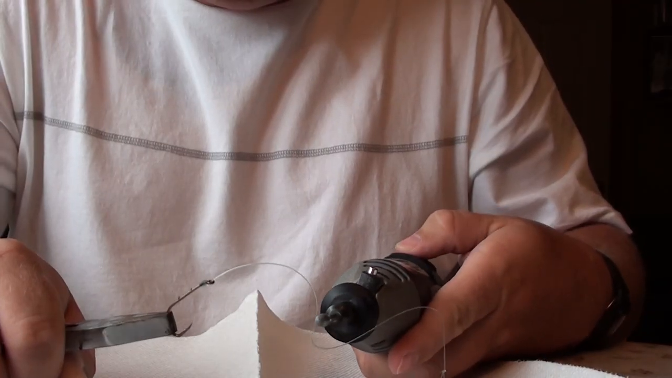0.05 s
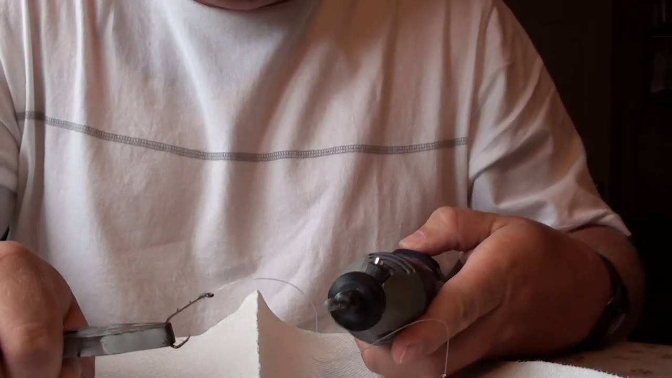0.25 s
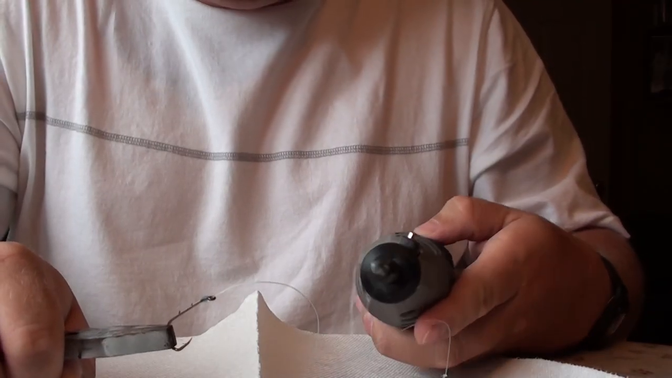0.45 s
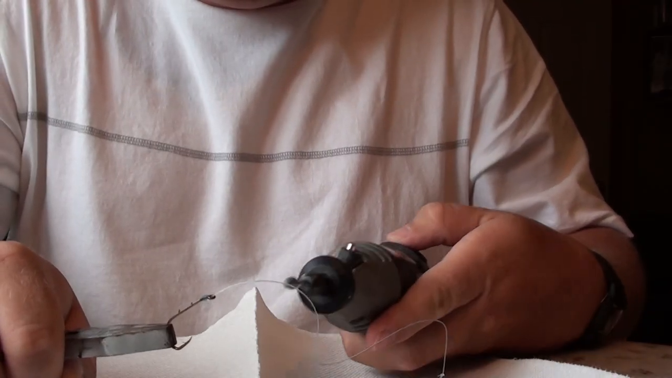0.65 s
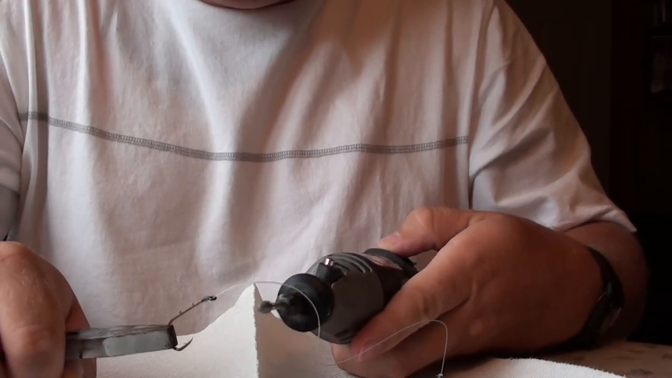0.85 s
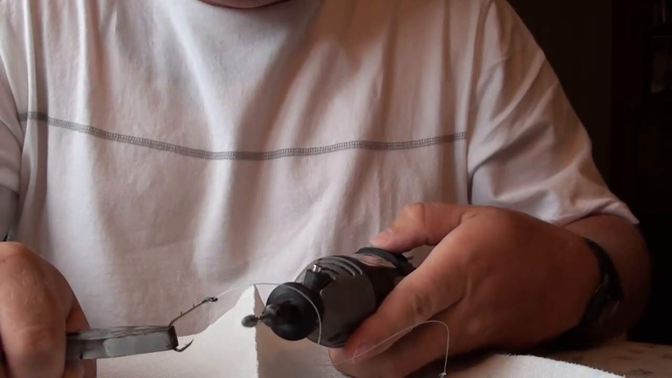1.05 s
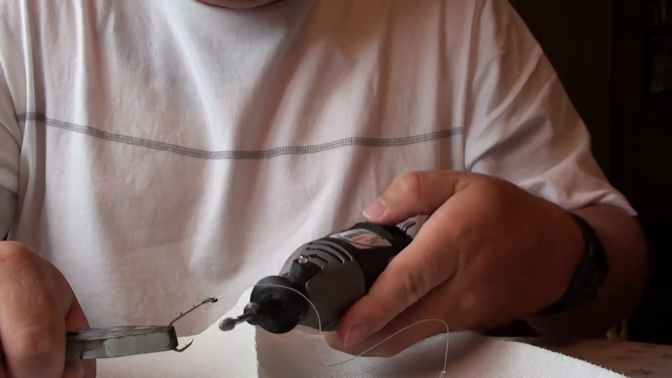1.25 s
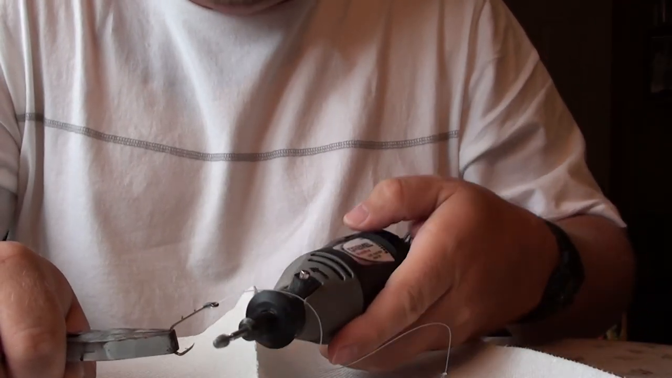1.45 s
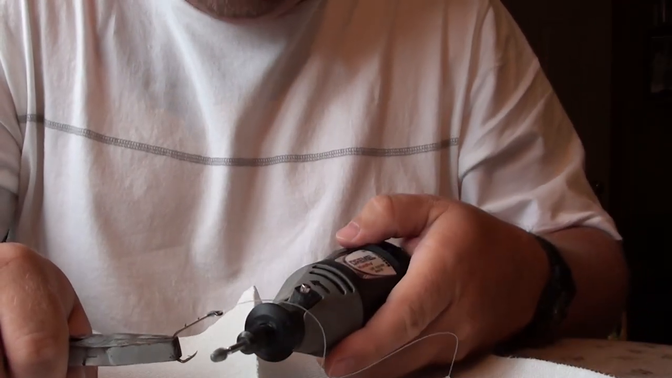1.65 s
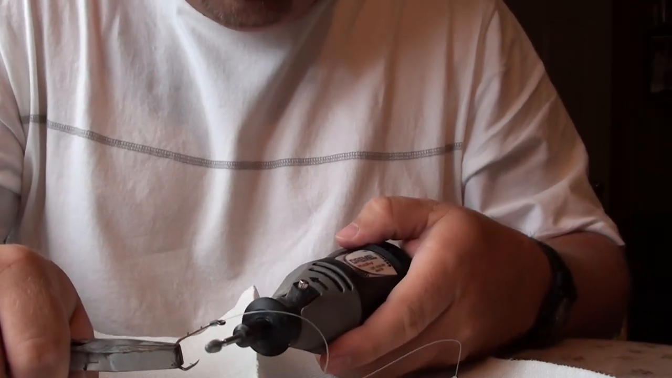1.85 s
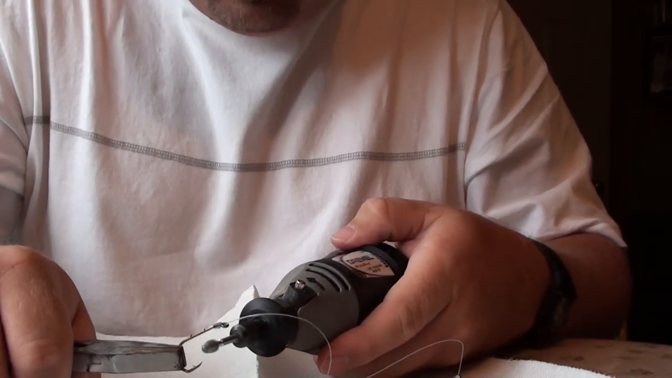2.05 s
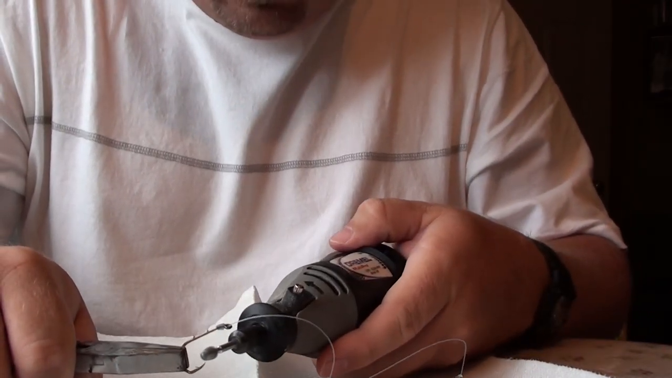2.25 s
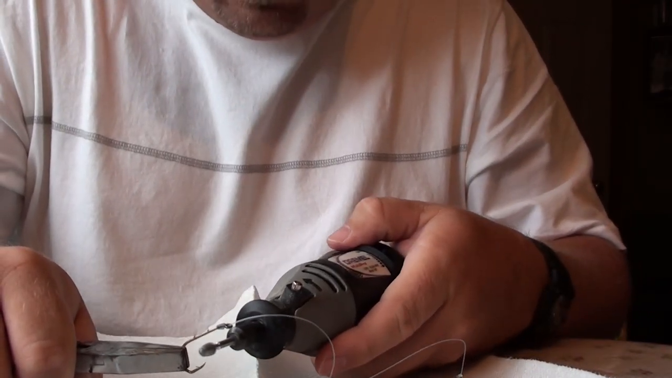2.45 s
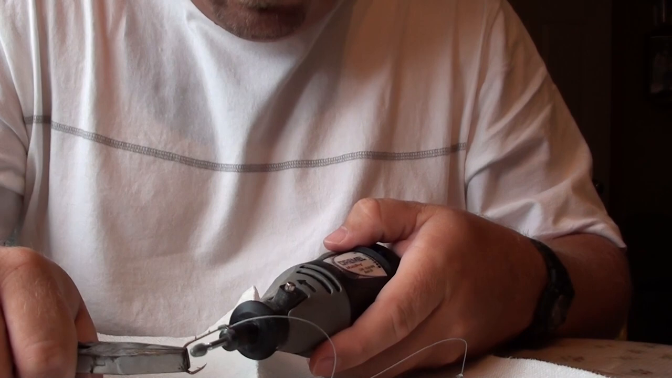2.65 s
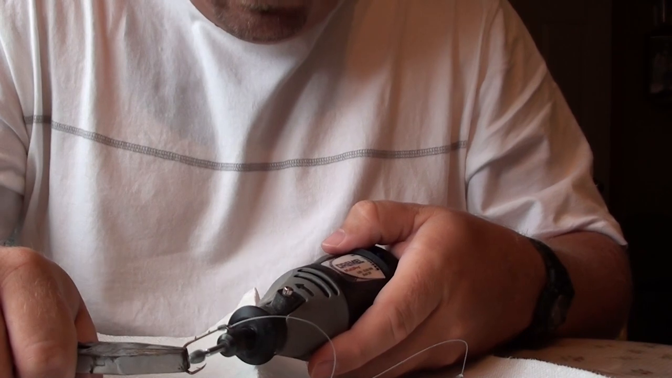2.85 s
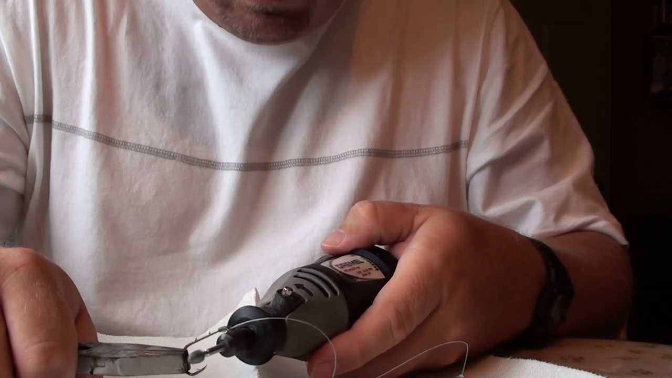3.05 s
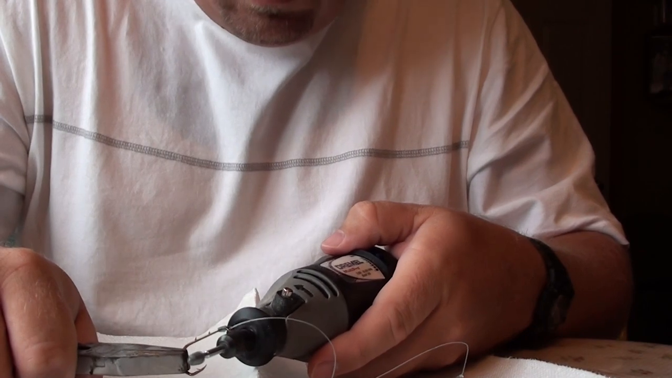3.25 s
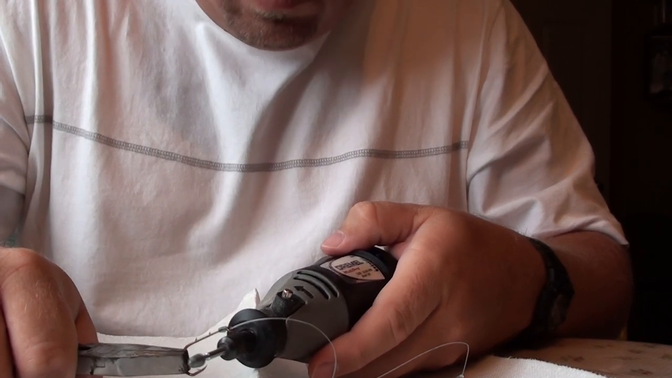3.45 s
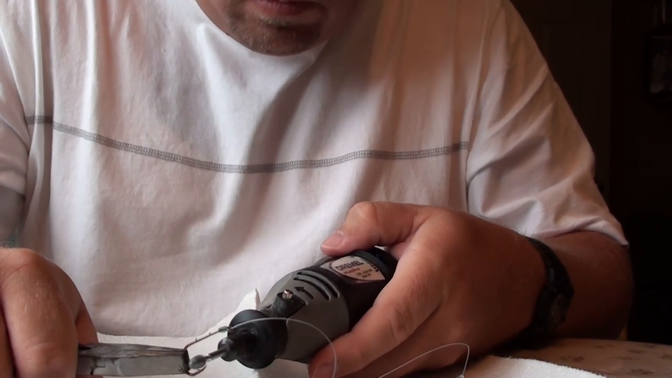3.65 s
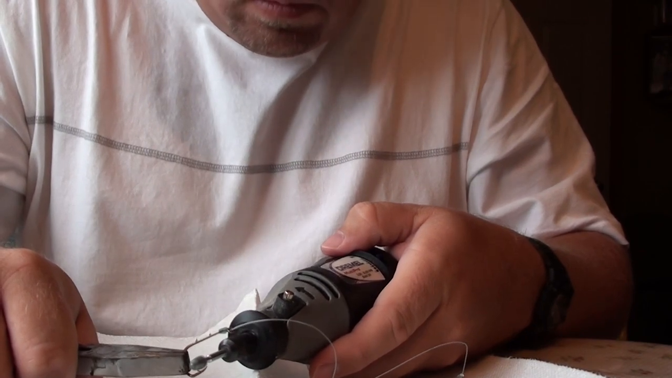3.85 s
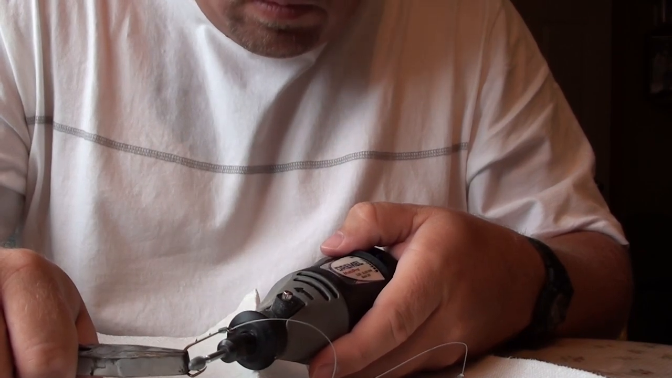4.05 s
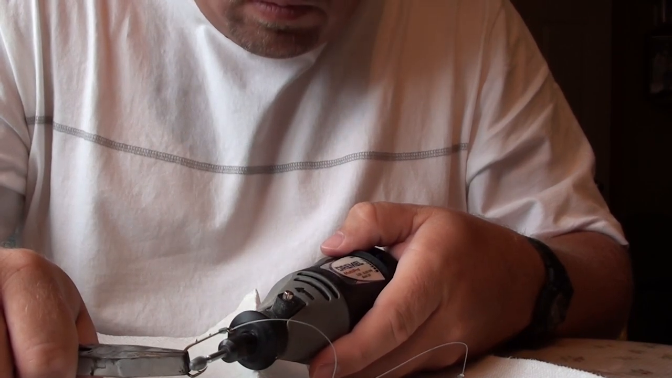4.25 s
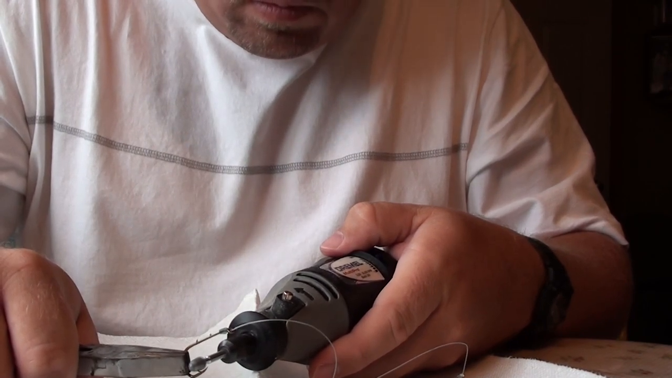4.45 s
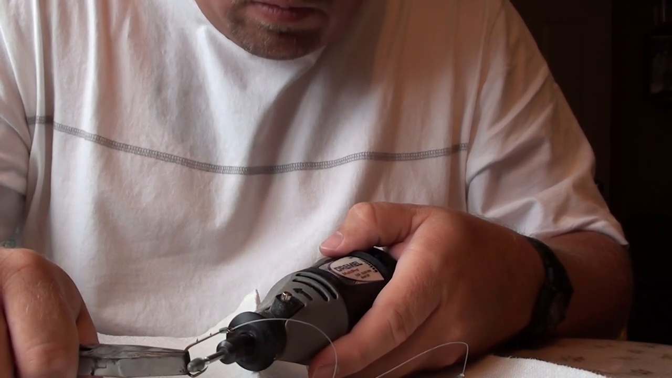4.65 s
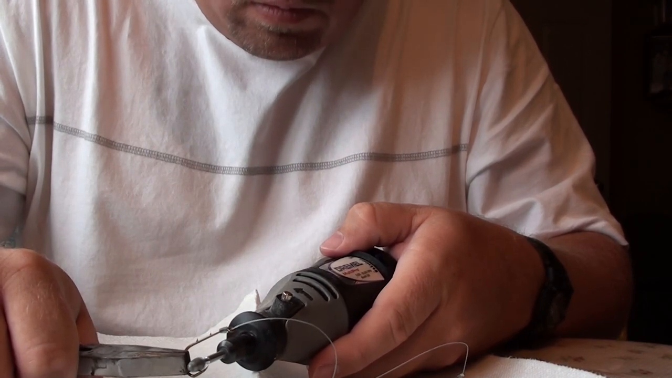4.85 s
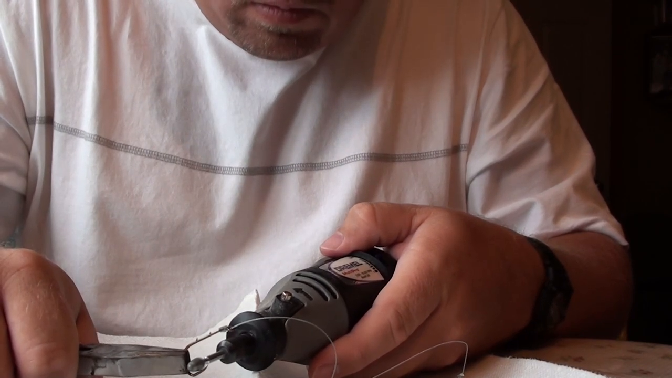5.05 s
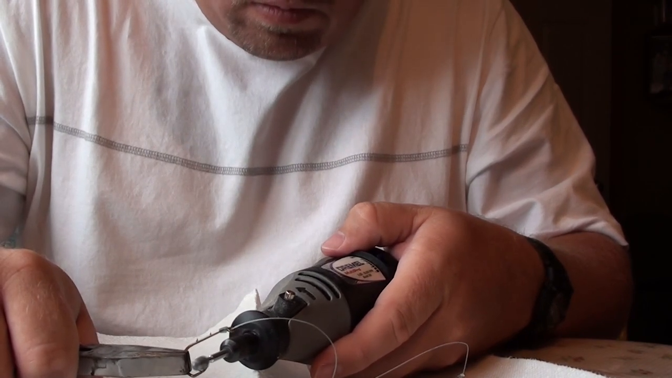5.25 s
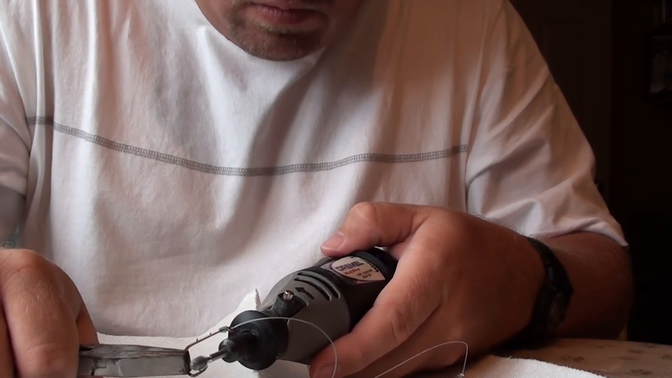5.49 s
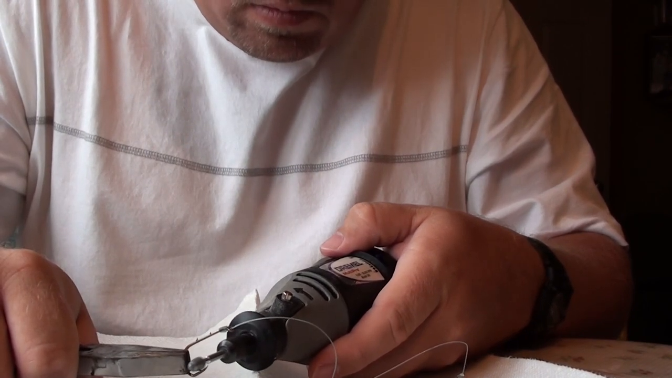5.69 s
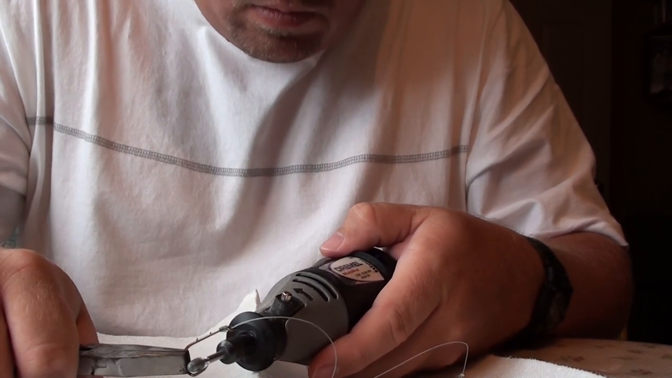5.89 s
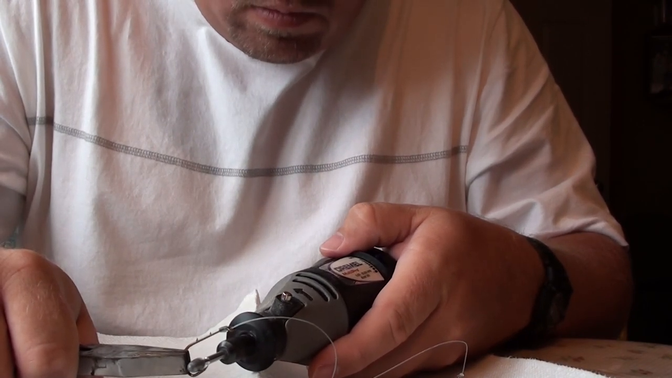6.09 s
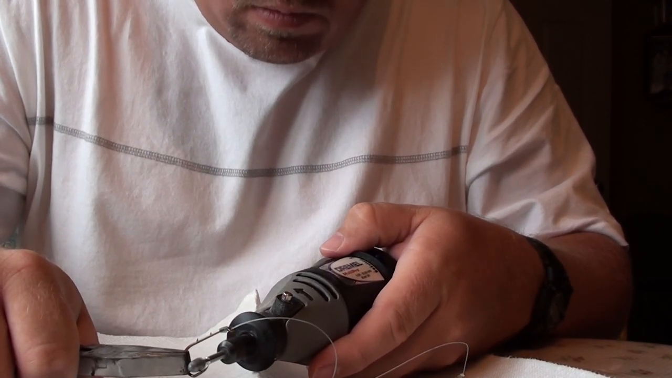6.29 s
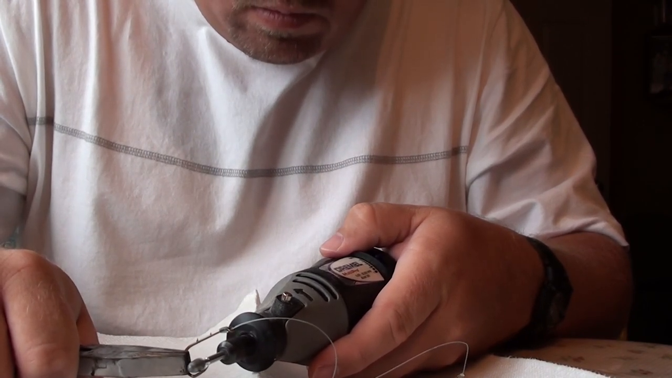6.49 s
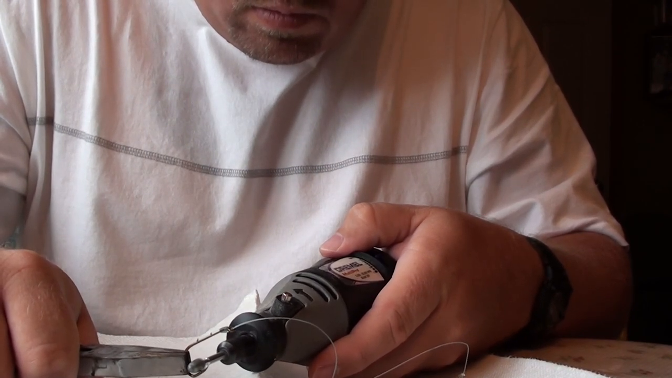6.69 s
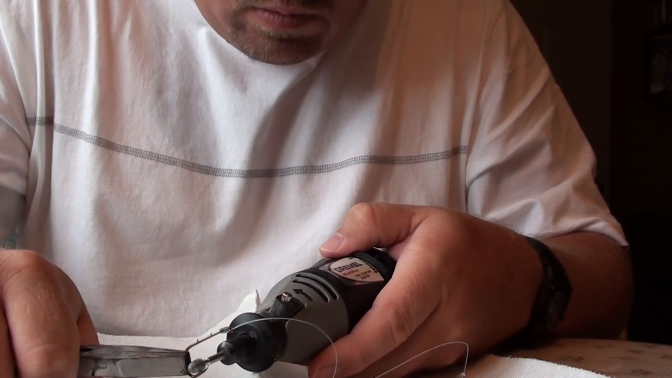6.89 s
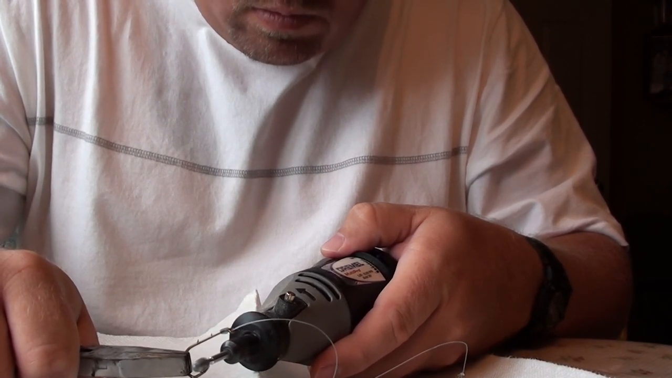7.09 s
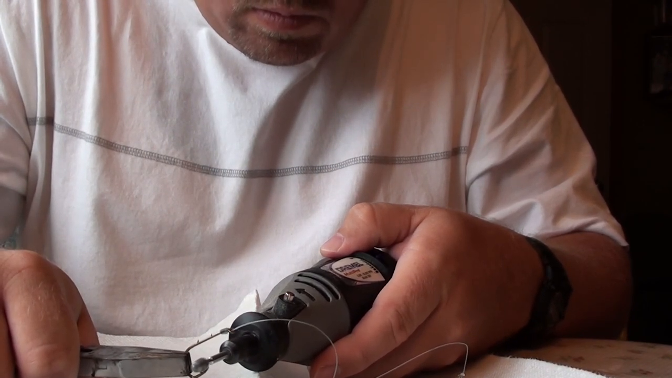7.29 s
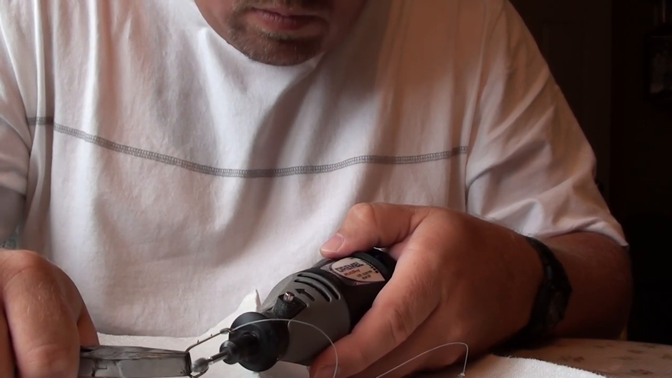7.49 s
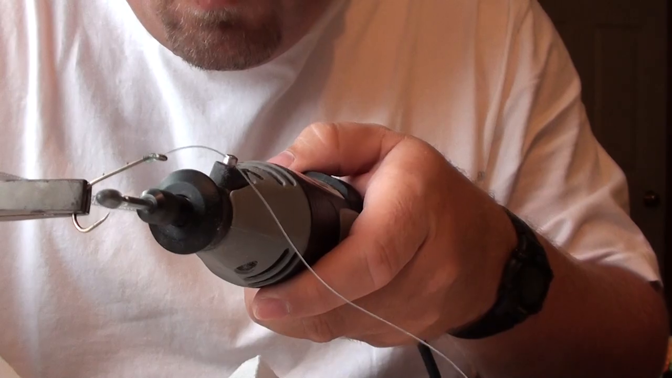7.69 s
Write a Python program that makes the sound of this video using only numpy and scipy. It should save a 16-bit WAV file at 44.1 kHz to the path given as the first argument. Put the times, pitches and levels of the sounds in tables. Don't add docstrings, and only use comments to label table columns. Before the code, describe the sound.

A mains-powered rotary tool very close to the microphone whirrs and accelerates, clicks to a faster setting and settles into a steady, rough electric whine with airy fan hiss. After about three seconds, abrasive metal grinding begins, dry, shrill and uneven, with brief pliers rings and low buzzing shakes of the hook. Faint room rumble and hum lie beneath, with little echo.

```python
import sys
import numpy as np
from scipy import signal
from scipy.fft import rfft, irfft, next_fast_len
from scipy.io import wavfile
from scipy.ndimage import uniform_filter1d, minimum_filter1d, map_coordinates

SR = 44100
rng = np.random.default_rng(int(sys.argv[2]) if len(sys.argv) > 2 else 0)


def transcribe(signal):
    frames = np.atleast_2d(signal).T
    limited = np.clip(frames, -1, 1)
    pcm = np.round(limited * 32767).astype(np.int16)
    wavfile.write(sys.argv[1], SR, pcm)


def linear_from_db(decibels):
    return 10 ** (np.asarray(decibels, float) / 20)


N = 340893
MAINS_HZ = 120.005


def unit(x):
    return x / np.sqrt(np.mean(x ** 2) + 1e-20)


def levelled(x):
    return x / np.sqrt(np.abs(uniform_filter1d(x ** 2, size=SR // 12)) + 1e-12)


def along(points, hz):
    f, v = np.transpose(points)
    return np.interp(np.log(hz + 1), np.log(f + 1), v)


def curves(rows):
    s, *cols = np.transpose(rows)
    return [np.interp(np.arange(N) / SR, s, c) for c in cols]


def wobble(rate):
    at = np.arange(0, N + 32, 32)
    knots = rng.standard_normal(int(N * rate / SR) + 4)
    return np.interp(np.arange(N), at, map_coordinates(knots, [at * rate / SR]))


def presses(rows, ramp_s):
    t = np.arange(N) / SR
    return sum(linear_from_db(db) * np.clip(np.minimum(t - start, end - t) / ramp_s, 0, 1) for start, end, db in rows)


def filtered(x, response):
    m = next_fast_len(N + SR // 2)
    return irfft(rfft(x, m) * response(np.fft.rfftfreq(m, 1 / SR)), m)[..., :N]


def resonances(modes, f):
    return sum((-1) ** k * linear_from_db(db) * 1j * f * w / (c * c - f * f + 1j * f * w)
               for k, (c, w, db) in enumerate(modes))


def resonant(x, modes, skirt_hz):
    skirt = [(modes[1][0], skirt_hz, 0)]
    return filtered(x, lambda f: resonances(modes, f) * resonances(skirt, f))


# (frequency [Hz], level [dB per Hz])
RUMBLE_COLOUR = [(22, -40), (45, -28), (95, -13), (130, -0.5), (200, 0), (350, -1.5), (500, 1.5),
                 (900, -31)]
# (frequency [Hz], level re rumble [dB])
MAINS_HUM = [(60, -25), (120, -12), (480, -3)]
HOUSE_DB = -56.5


def house():
    t = np.arange(N) / SR
    hum = sum(linear_from_db(db + 2.9 * wobble(6)) * np.sin(2 * np.pi * hz * t + 0.65 * wobble(11)) for hz, db in MAINS_HUM)
    rumble = unit(filtered(rng.standard_normal(N), lambda hz: linear_from_db(along(RUMBLE_COLOUR, hz))))
    return linear_from_db(HOUSE_DB + 5.5) * (rumble + hum)


# (frequency [Hz], time to fall 60 dB [s])
REVERB_TIMES = [(200, 0.66), (2000, 0.057), (12000, 0.22)]


def room(x):
    hz, t, z = signal.stft(rng.standard_normal((2, SR // 3)), SR, nperseg=256)
    decay = linear_from_db(-60 * t / along(REVERB_TIMES, hz)[:, None])
    tail = signal.istft(z * decay, SR, nperseg=256)[1]
    delayed = np.pad(x, (200, 0))[None]
    return signal.fftconvolve(delayed, tail / np.linalg.norm(tail[0]), axes=1)[:, :N]


# (time [s], peak level [dB], frequency [Hz])
SLIDER_CLICKS = [
    (0.922, -6, 3950),
    (0.934, -4, 2500),
]


def switch():
    out, t = np.zeros(N), np.arange(SR // 50) / SR
    for s, db, hz in SLIDER_CLICKS:
        noise = uniform_filter1d(rng.standard_normal(len(t) + 1), size=4)
        crack = np.diff(uniform_filter1d(noise, size=3))
        decay = linear_from_db(db - 8.5 - 60 * t / 0.027)
        out[round(s * SR):][:len(t)] += decay * (0.5 * np.sin(2 * np.pi * hz * t) + 3 * crack)
    return out


SLOW_TPS, SLOW_GAP_TPS, SLOW_LAG_S = 185, 78, .6
FAST_GAP_TPS, FAST_LAG_S = 118, .37
# (time [s], speed [turns per s])
FAST_SPEED = [
    (.92, 286.8),
    (2.2, 288.2),
    (2.8, 288),
    (4.0, 290.6),
    (4.6, 290.6),
    (5.2, 289.5),
    (5.8, 290.5),
    (6.7, 289.6),
    (7.0, 288.7),
    (7.73, 289.3),
]


def spin():
    t = np.arange(N) / SR
    step_s = FAST_SPEED[0][0]
    slow = SLOW_TPS - SLOW_GAP_TPS * np.exp(-t / SLOW_LAG_S)
    fast = curves(FAST_SPEED)[0] - FAST_GAP_TPS * np.exp((step_s - t) / FAST_LAG_S)
    return np.where(t < step_s, slow, fast)


# (order [per turn], slow level [dB], fast level [dB]), re fan hiss
SHAFT_ORDERS = [(1.007, -26, -17), (1.432, -46, -23), (3.002, -39, -29), (12, -32, -18.5), (13, -50, -12.5),
                (13.9, -18.5, -14), (18.02, -26, -8), (18.4, -21, -31), (22.16, -17, -21.5),
                (25.03, -22, -19), (25.9, -27, -20.5), (26.05, -33, -17), (26.3, -37, -53), (28, -35, -28),
                (28.67, -26, -23), (35.56, -52, -22), (35.5, -46, -18), (37.5, -34, -19), (38.6, -29, -34),
                (42.5, -22, -40), (41.6, -40, -21), (46.6, -30, -29), (47.6, -27, -18), (49.5, -23, -24),
                (54, -21, -18)]
# (frequency [Hz], level [dB per Hz])
SLOW_COLOUR = [(150, -37), (250, -20), (775, -11.5), (1140, -5.5), (1370, -8.5), (1900, -10), (2500, -2),
               (2980, -10.5), (3470, -5.5), (5440, -7), (6100, -4), (7930, -3.5), (13400, -18.5),
               (16000, -31)]
# (frequency [Hz], level [dB per Hz])
FAST_COLOUR = [(150, -37), (283, -26), (715, -16), (852, -9.5), (1180, -12), (1340, -21.5), (1810, -11),
               (2320, -16.5), (3140, -17.5), (3830, -14.5), (5720, -15.5), (7450, -6), (14100, -24.5),
               (16000, -36)]
BRUSH_DB = -19.5


def fan(turns, speed, level_db):
    fast = np.clip((speed - 170) / 90, 0, 1)
    sway, drift = [wobble(7) for _ in range(4)], [wobble(14) for _ in range(3)]
    lines = 0
    for i, (k, slow_db, fast_db) in enumerate(SHAFT_ORDERS):
        line_db = slow_db + fast * (fast_db - slow_db) + 2.5 + 1.9 * (1 - fast) + 0.96 * sway[i % 4]
        lines = lines + linear_from_db(line_db) * np.sin(2 * np.pi * k * turns + 0.74 * drift[i % 3])
    pulse_db = 0.73 * np.cos(2 * np.pi * MAINS_HZ * np.arange(N) / SR)
    air = rng.standard_normal(N) * linear_from_db(0.59 * wobble(30) + pulse_db)
    rub = sum(linear_from_db(2.3 * sway[k % 4]) * np.sin(2 * np.pi * k * turns + k * k / 9) for k in range(19, 46))
    brush = linear_from_db(BRUSH_DB) * (1 - fast) * rub
    slow_air, fast_air = filtered(air + lines + brush,
                                  lambda hz: linear_from_db([along(SLOW_COLOUR, hz), along(FAST_COLOUR, hz)]))
    return linear_from_db(level_db) * ((1 - fast) * linear_from_db(8.0) * unit(slow_air) + fast * linear_from_db(10) * unit(fast_air))


# (order [per turn], burst level [dB], surge level [dB])
SLOT_TONES = [(7.99, 3.5, -11), (16.24, -3.5, -14.5), (24.4, -12, -22.5), (32.3, -31, -25),
              (41.1, -18, -14)]
# (frequency [Hz], width [Hz], level [dB])
CASE_MODES = [(1190, 200, -8), (1520, 200, -51), (2416, 366, 4.5), (3700, 1040, -4.5), (4340, 290, -0.3),
              (6010, 180, 11), (7600, 620, -37)]
STEP_S = .93


def whine(turns, speed, level_db):
    t = np.arange(N) / SR
    firing = np.where(t < STEP_S, .14, -.03)
    u = (MAINS_HZ * t - firing) % 1
    pulse = (1 - np.exp(-(u / 0.096) ** 2)) * np.exp(-u / 0.11)
    current = pulse * linear_from_db(0.79 * wobble(90)) + 0.00091
    acceleration = uniform_filter1d(np.gradient(speed) * SR, size=SR // 25) / 250
    surge = np.clip(acceleration, 0, 1.2) * .5 * np.cos(np.pi * (u - .2)) ** 4
    tones = 0
    for k, db, surge_db in SLOT_TONES:
        burst_db = db + (k > 8) * 4.8 * (t < STEP_S)
        size = linear_from_db(burst_db) * current + linear_from_db(surge_db) * surge
        tones = tones + size * np.sin(2 * np.pi * k * turns + 0.012 * k * wobble(25))
    sparks = linear_from_db(-13.5) * current * rng.standard_normal(N)
    return linear_from_db(level_db) * levelled(filtered(tones + sparks, lambda f: resonances(CASE_MODES, f)))


# (start [s], end [s], level [dB], order [per turn])
PLIER_RINGS = [
    (4.688, 4.862, -28, 6),
    (5.976, 6.06, -33, 6),
    (4.42, 4.6, -33, 12),
    (4.7, 4.95, -34, 13),
    (5.35, 5.5, -31, 12),
    (5.66, 5.85, -28, 13),
    (5.92, 6.3, -27, 12),
    (5.98, 6.25, -33, 13),
    (6.76, 7.02, -24, 16),
    (7.15, 7.68, -22.5, 13),
]


def jaws(turns):
    waver = [linear_from_db(2.5 * wobble(40)) * np.exp(.5j * wobble(30)) for _ in range(3)]
    ring = 0
    for i, row in enumerate(PLIER_RINGS):
        tone = waver[i % 3] * np.exp(2j * np.pi * round(row[3]) * turns)
        ring = ring + presses([row[:3]], 0.025) * tone.imag
    return ring


# (start [s], end [s], level [dB])
HOOK_SHAKES = [
    (2.98, 7.73, -69),
    (4.05, 4.3, -52),
    (4.55, 4.9, -59),
    (5.28, 5.48, -50),
    (5.85, 6.5, -57),
    (6.28, 6.4, -53),
    (6.62, 7.5, -58),
    (7.02, 7.66, -47),
]


def rattle(turns):
    swing = np.sin(np.pi * turns + 0.33 * wobble(18)) + .5 * np.sin(3 * np.pi * turns)
    return presses(HOOK_SHAKES, 0.017) * linear_from_db(1.3 * wobble(8.3)) * swing


CONTACT_SPOTS = {"bend": (-25, -19.5, -29.5, -31, -37, 0.64), "barb": (-24.5, -18, -16, -25.5, -29.5, .65),
                 "point": (-20, -15, -22.5, -19, -30, .7), "throat": (-21.5, -13, -19, -22, -30, 0.75),
                 "shank": (-21.5, -19, -30.5, -23.5, -22.5, 0.72), "eye": (-20, -30, -27, -26.5, -22, .5),
                 "crown": (-26, -23, -21.5, -19, -27, 0.7), "inside": (-26, -12.5, -29.5, -30, -37, .3),
                 "back": (-16, -13.5, -20.5, -20.5, -25, 0.75)}
# (time [s], pressure [dB], spot [name], skip of every other turn [0-1])
STONE_STROKES = [(2.98, 0, "bend", .9), (3.015, -9, "bend", .9), (3.085, 4.5, "bend", 0.6),
                 (3.254, -5, "bend", 0.8), (3.288, 2, "bend", 0.6), (3.352, -10, "bend", 0.5),
                 (3.442, 6, "bend", 0.4), (3.454, -16, "bend", 0.4), (3.755, -0.2, "barb", 0.65),
                 (3.95, 1.3, "barb", 0.9), (4.33, 2.5, "barb", 0.53), (4.45, -.6, "barb", 0.6),
                 (4.56, -0.3, "crown", 0.95), (4.69, 2, "point", 0.44), (4.93, 2, "point", 0.83),
                 (5.33, 0, "barb", 1), (5.36, 1, "eye", 0.7), (5.43, 3, "barb", 0.53),
                 (5.5, 0.9, "throat", 0.96), (5.68, 2, "throat", 0.4), (5.83, -1.5, "back", 0.92),
                 (5.98, -0.1, "back", 0.7), (6.3, 1.2, "eye", 0.8), (6.41, -1.5, "back", 0.77),
                 (6.5, 1.5, "shank", .93), (6.67, -3.5, "eye", 1), (6.78, 1, "shank", 1),
                 (7.12, -10, "shank", .95), (7.161, -3, "shank", 1), (7.685, -1, "inside", 0.4)]
SLIDE_S, ROLL_S = 0.0075, 0.038


def hand():
    now = np.searchsorted([row[0] for row in STONE_STROKES[1:]], np.arange(N) / SR)
    spots = np.transpose([CONTACT_SPOTS[row[2]] for row in STONE_STROKES])
    spot = uniform_filter1d(spots[:, now], size=round(ROLL_S * SR), axis=1)
    touches = np.transpose([row[1::2] for row in STONE_STROKES])
    press_db, skip = uniform_filter1d(touches[:, now], size=round(SLIDE_S * SR), axis=1)
    return *(spot[:-1] + press_db), spot[-1], skip


# (frequency [Hz], width [Hz], level [dB])
SHANK_MODES = [(3584, 250, -1), (3782, 102, 3.5), (4210, 330, -3), (4616, 99, -5)]
BEND_MODES = [(6650, 690, -6), (7310, 180, 3), (7660, 440, -2), (8140, 130, -4)]
BARB_MODES = [(8640, 510, 4), (9340, 580, 4), (10060, 120, 2)]
POINT_MODES = [(11220, 830, -2), (12090, 250, 1), (12200, 470, 1.5)]
TIP_MODES = [(13200, 270, 2.3), (14470, 510, 1.8), (14200, 250, 1.1), (14800, 320, 1.5)]
WANDER_DB = 2
SLIP_SAMPLES = 1.02
STEADIES = .35


def stone(turns):
    shank_db, bend_db, barb_db, point_db, tip_db, regular, skip = hand()
    regular = np.clip(regular + STEADIES * (.7 - skip), 0, 1)
    skip = np.clip(1.02 * skip, 0, 1)
    turn = turns.astype(int)
    slip = SLIP_SAMPLES * (1 - regular) * rng.standard_normal(turn[-1] + 2)[turn]
    u = (turns % 1 - .5) * SR / 290 + slip
    scuff = unit(np.cos(1.4 * u - np.pi * u ** 2 / 250) * np.exp(-(u / 36) ** 4))
    grit = unit(rng.standard_normal(N) * (np.exp(-(u / 20) ** 2) + 0.15))
    blows = np.sqrt(regular) * scuff + np.sqrt(1 - regular) * grit
    # modes, skirt width [Hz], level [dB], bounce [0-1]
    parts = [(SHANK_MODES, 1800, shank_db, .35), (BEND_MODES, 1900, bend_db, .95),
             (BARB_MODES, 1900, barb_db, .9), (POINT_MODES, 2600, point_db, .9), (TIP_MODES, 3500, tip_db, .9)]
    shared, hook = rng.uniform(-0.75, 1, turn[-1] + 2), 0
    for modes, width_hz, db, bounce in parts:
        luck = (0.7 * shared + .5 * rng.uniform(0.2, 1, turn[-1] + 2))[turn]
        uneven = linear_from_db(bounce * (1.0 + 18.0 * (1 - regular)) * luck)
        size = (1 - bounce * skip * (turn % 2)) * uneven
        part_db = db + WANDER_DB * wobble(12) + 1.66 * bounce * wobble(28)
        hook = hook + linear_from_db(part_db) * levelled(resonant(size * blows, modes, width_hz))
    return hook * (np.arange(N) > STONE_STROKES[0][0] * SR)


# (time [s], left minus right level [dB])
LEAN = [
    (0, -.6),
    (2.7, -.7),
    (3.2, -.1),
    (7.73, 0),
]
# (frequency [Hz], side minus mid level [dB])
SIDE_LEVEL = [(60, -34), (110, -28), (200, -34), (380, -21), (700, -28), (1290, -29), (2380, -18),
              (4400, -25.5), (8120, -26.5), (15000, -80)]
WHINE_DB, WHINE_GROWS, IDLE_DB = -15.5, 3.34, -37
FAN_DB, FAN_GROWS = -28.5, 1.16


def scene():
    speed = spin()
    speed_db = 20 * np.log10(speed / speed.max())
    turns = np.cumsum(speed) / SR
    whine_db = 20 * np.log10(np.hypot(linear_from_db(WHINE_DB + WHINE_GROWS * speed_db), linear_from_db(IDLE_DB)))
    motor = whine(turns, speed, whine_db) + fan(turns, speed, FAN_DB + FAN_GROWS * speed_db)
    direct = motor + stone(turns) + rattle(turns) + switch() + jaws(turns) + house()
    mid_tail, side_tail = room(direct)
    side = filtered(side_tail, lambda hz: linear_from_db(along(SIDE_LEVEL, hz) + 1.5))
    lean = linear_from_db(np.outer([.5, -.5], curves(LEAN)[0] + 0.18 * wobble(1.86)))
    return lean * direct + linear_from_db(-14.0) * mid_tail + np.array([side, -side])


def band_limit(x):
    return signal.sosfilt(signal.butter(12, 16200, fs=SR, output="sos"), x)


HOLD_DB, FIRMNESS = -13, 1
GRAB_S, KEEP_S, REACT_S = 0.0044, .02, 0.0046


def record(dry):
    power = np.abs(uniform_filter1d(np.mean(dry ** 2, axis=0), size=round(GRAB_S * SR)))
    cut_db = -FIRMNESS * np.clip(10 * np.log10(power + 1e-9) - HOLD_DB, 0, None)
    keep = round(KEEP_S * SR)
    lowest_db = minimum_filter1d(cut_db, size=keep, origin=keep // 3)
    held = dry * linear_from_db(uniform_filter1d(lowest_db, size=round(REACT_S * SR)))
    rounded = held / (1 + np.abs(held / .85) ** 5) ** (1 / 5)
    return band_limit(rounded)


dry = scene()
out = record(dry)
transcribe(out)
```